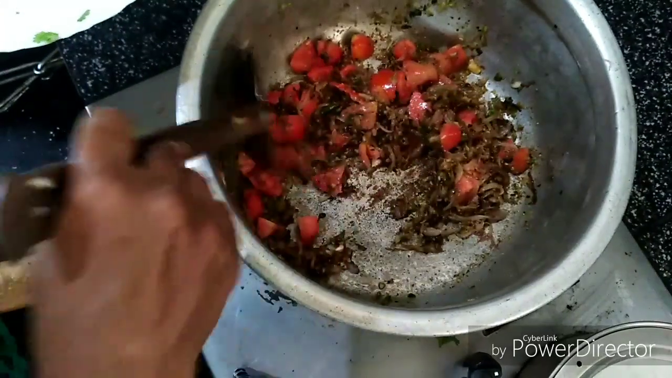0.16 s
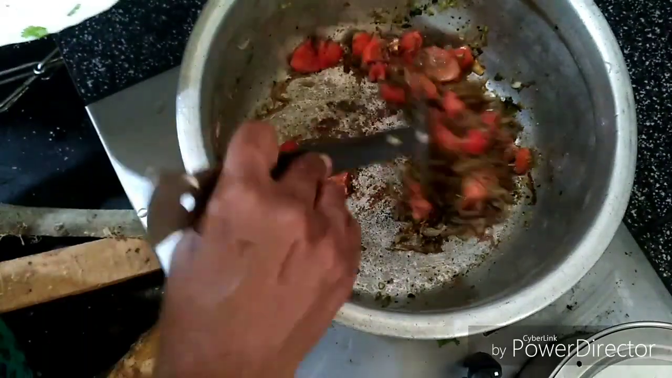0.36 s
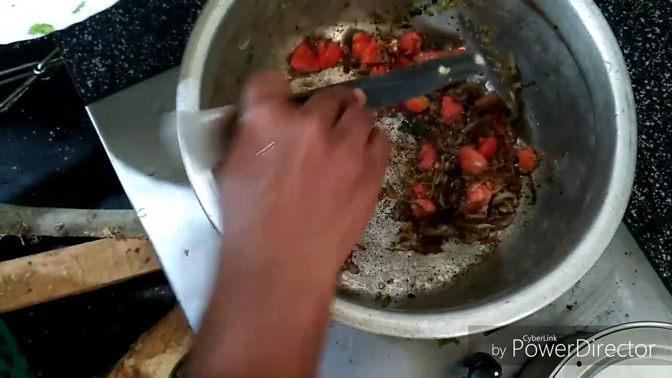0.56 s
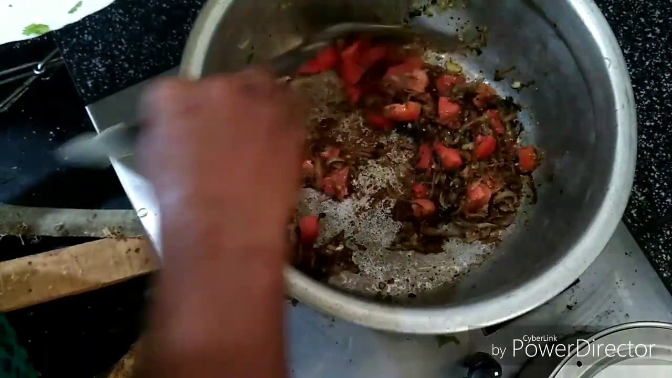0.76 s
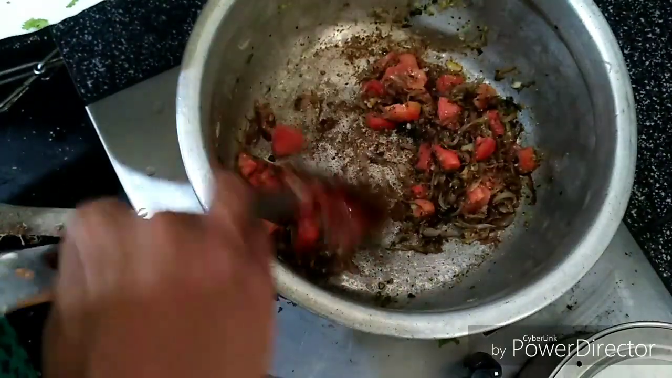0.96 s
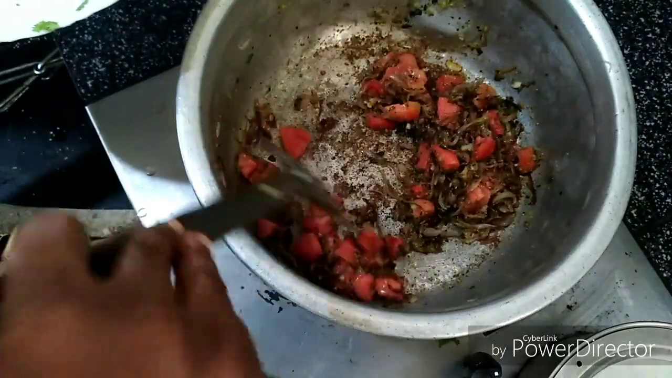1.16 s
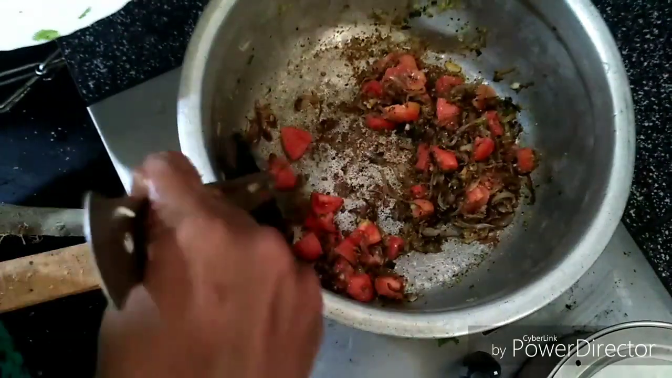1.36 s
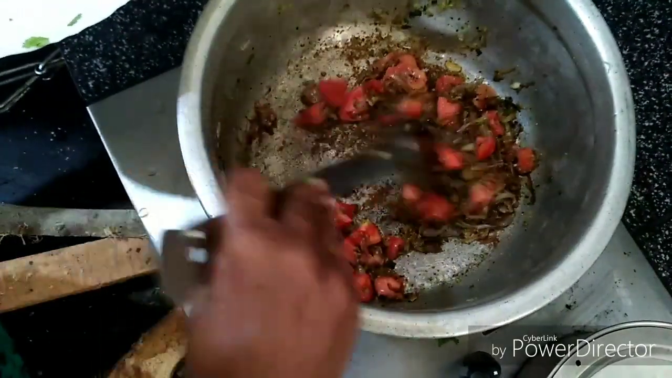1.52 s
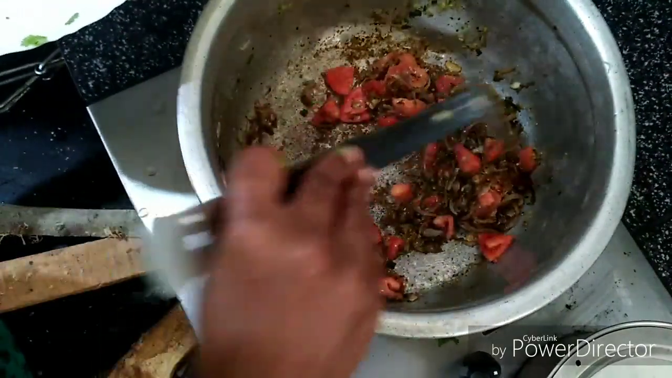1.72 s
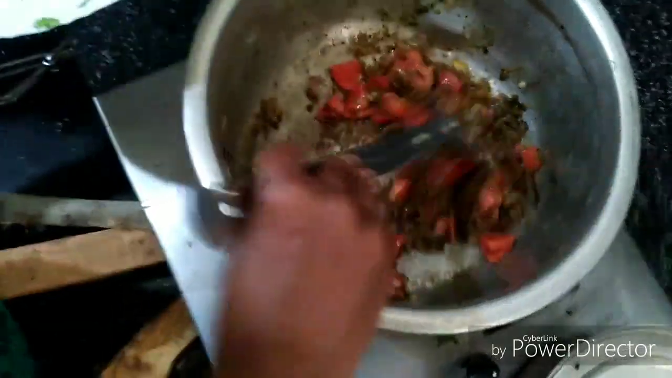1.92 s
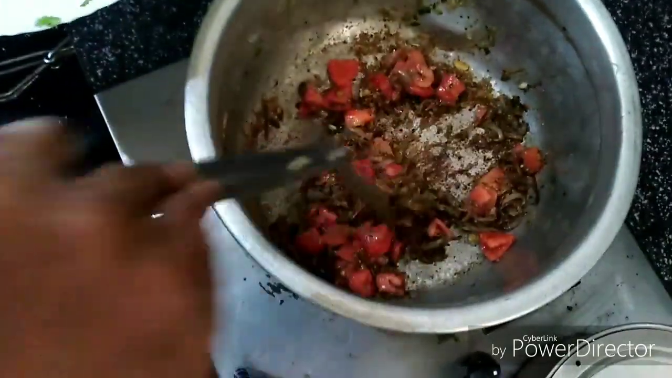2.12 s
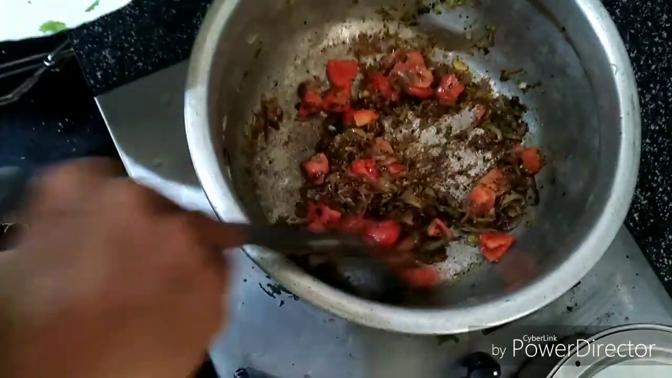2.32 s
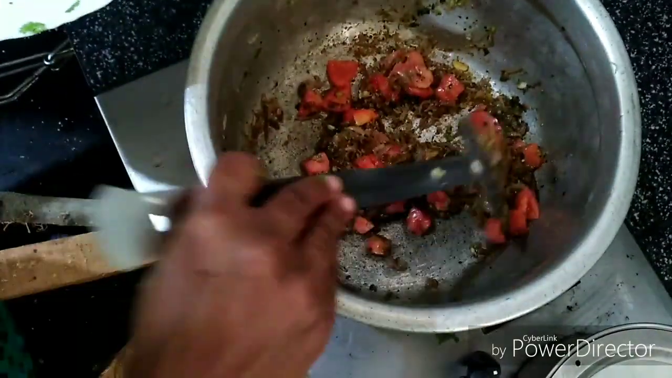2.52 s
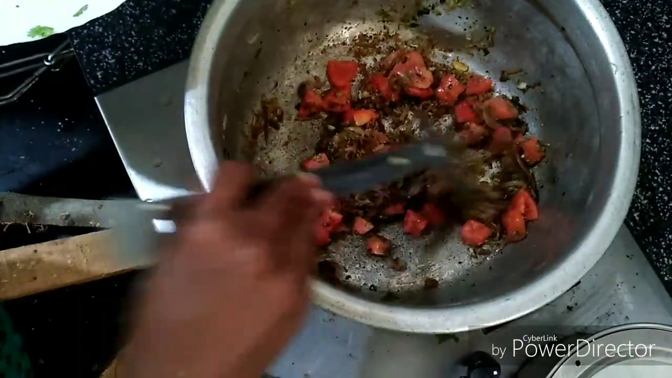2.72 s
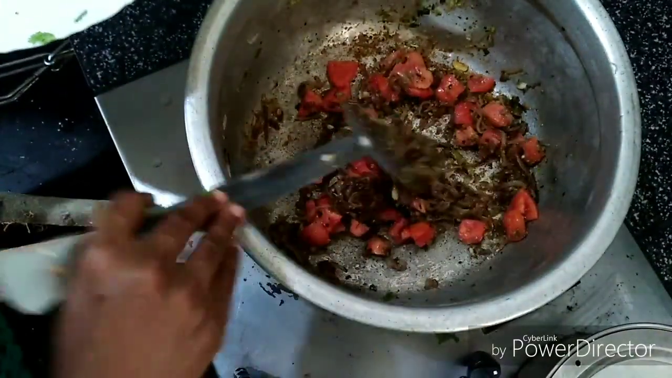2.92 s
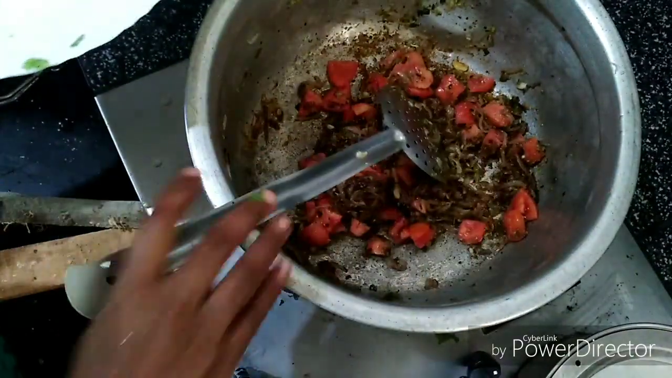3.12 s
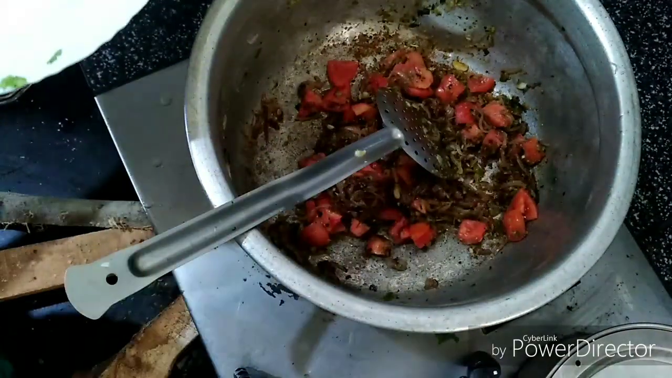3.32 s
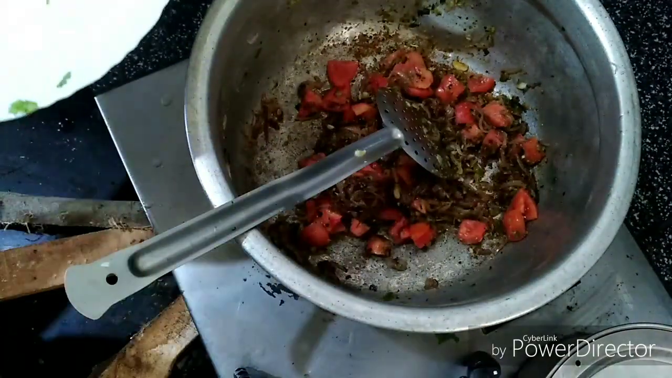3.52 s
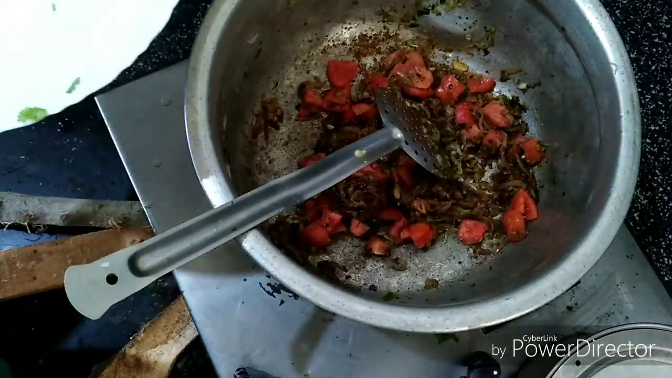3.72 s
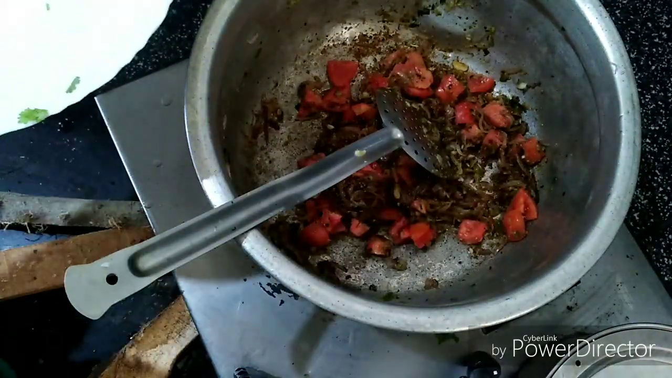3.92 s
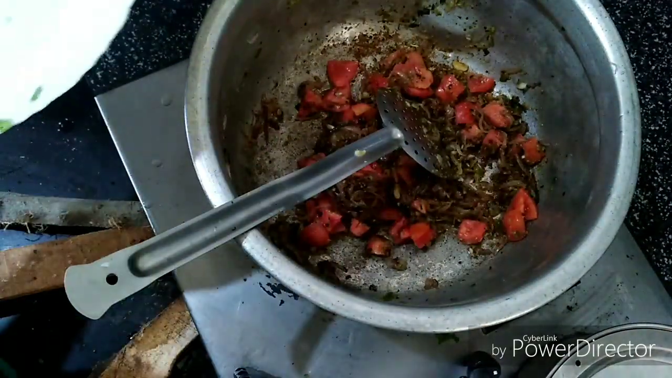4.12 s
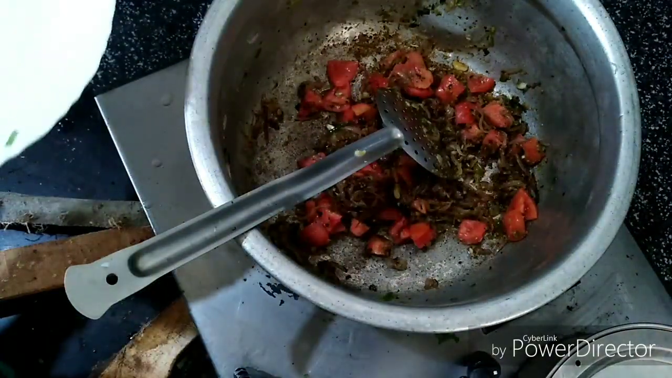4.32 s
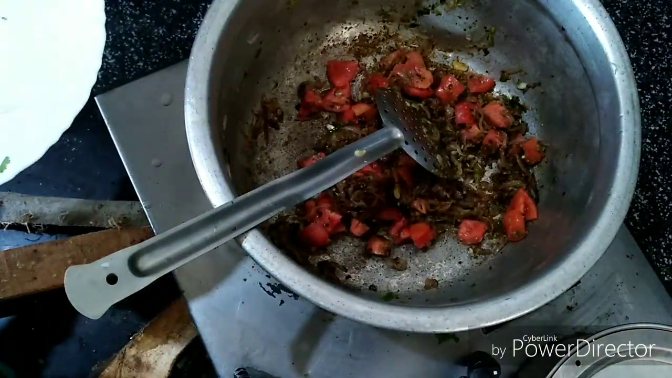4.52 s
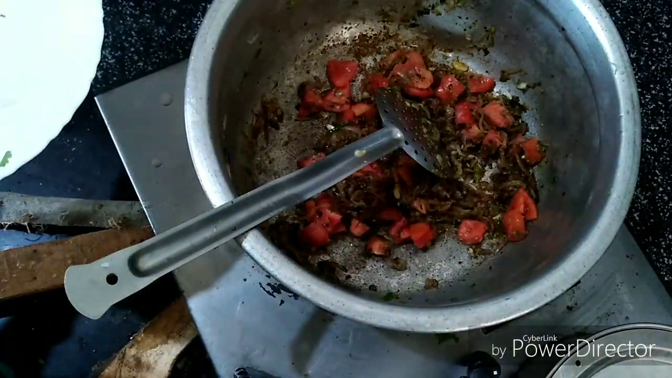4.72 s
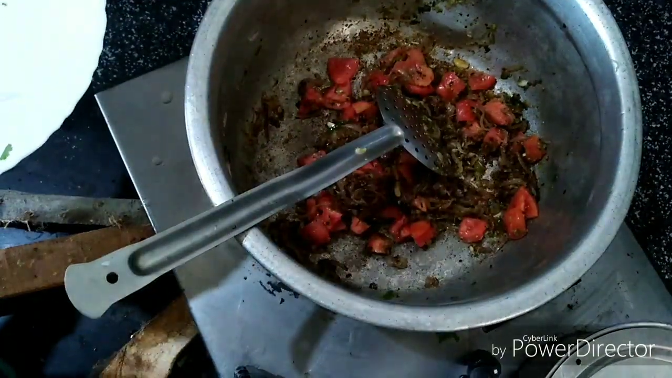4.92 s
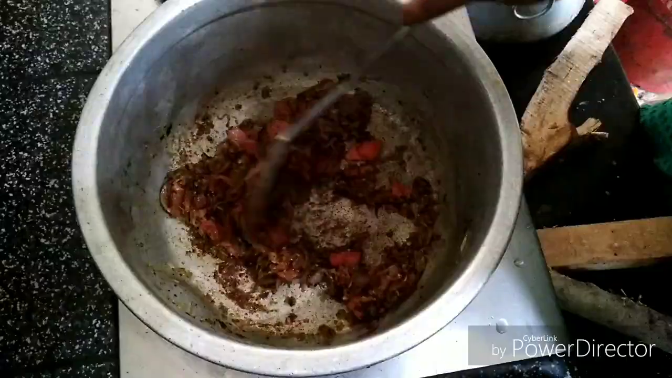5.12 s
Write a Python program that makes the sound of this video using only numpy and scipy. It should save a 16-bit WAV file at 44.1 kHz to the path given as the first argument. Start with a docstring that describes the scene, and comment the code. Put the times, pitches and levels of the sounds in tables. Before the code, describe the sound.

Close to the microphone in a small tiled kitchen, onions and tomatoes sizzle in a steel pot over a softly roaring gas flame. For three seconds a metal spoon clanks, knocks and scrapes the bottom, with short groaning judders. It is dropped on the rim in a double clank. Frying alone follows, with a fresh hiss, then a sudden cut and a very faint return.

```python
"""Frying in a steel pot

Onions and tomatoes sizzle in a steel pot on a gas burner, close to the microphone: filtered random impulses and noise.
A slotted metal spoon clanks against the wall (decaying modes and noise bursts), scrapes over the bottom
four times (random slips) and judders (short harmonic tones), then is dropped on the rim.
Near the end the sound breaks off and fades in again, much fainter and low-pass filtered."""
import sys
import numpy as np
from scipy import signal
from scipy.fft import rfft, irfft, next_fast_len
from scipy.io import wavfile
from scipy.ndimage import map_coordinates

SR = 44100
rng = np.random.default_rng(int(sys.argv[2]) if len(sys.argv) > 2 else 0)


def materialize(psi):
    """Save the field psi as 16-bit PCM at rate SR to the path in sys.argv[1].

    A 1-D psi becomes a single channel; in a 2-D psi each row is a channel.
    """
    bounded = np.clip(np.atleast_2d(psi).T, -1, 1)
    quanta = np.round(bounded * 32767).astype(np.int16)
    wavfile.write(sys.argv[1], SR, quanta)


N = 231850

# Modes of the pot wall: (frequency [Hz], level [dB], free t60 [s], left-right level [dB], left lead [rad])
POT_MODES = [(253, -9.5, .22, 2, 0.5), (482, -4, 0.6, -10, 1.5), (740.9, -2, 2.58, 1.5, 0.56),
             (870, -6, 0.2, 1, -1.2), (1156, -1, 0.22, 2, 2), (1152, -10, 0.82, 0.5, 1.7),
             (1250, -1.5, 0.93, 0.5, 1.5), (1563, 0.5, 0.38, 4.5, 2), (1676, -3.5, 0.12, -12.5, -1.5),
             (1959, 1.5, 0.63, 8.5, 3), (1982, -2.5, 0.24, -25, 2.5), (2040, -6.5, 0.19, -1.5, 11.5),
             (2570, -11.5, 0.4, -3.5, -2), (2650, -4.5, 0.79, 4, 4)]
# Spectrum of the spoon's edge rasping on the crust: (frequency [Hz], level [dB])
RASP_SPECTRUM = [(530, -22.5), (900, -1), (1050, -25.5), (1220, -2), (1390, -4.5), (8830, -6.5),
                 (13700, -23), (14500, -25), (15000, -74.5)]

EAR = np.array([[.5], [-.5]])  # shares a left-right difference between the channels
WALL_SCATTER_DB = 1  # standard deviation of each wall mode from blow to blow
WALL_LIFT_DB, WALL_LIFT_OCTAVES = 11.5, 0.7  # wall modes near the pitch of the contact are lifted


def amp(db):
    """Amplitude ratio: 20 dB are a factor of ten."""
    return 10 ** (np.asarray(db) / 20)


def unit(x):
    """Normalization to an effective value (rms) of 1."""
    return x / np.sqrt(np.mean(x ** 2) + 1e-20)


def along(points, hz):
    """Spectral envelope: (Hz, value) points joined on a logarithmic frequency axis."""
    point_hz, values = np.transpose(points)
    return np.interp(np.log(hz + 1), np.log(point_hz + 1), values)


def since(s):
    """Time axis: seconds after time s for every sample, negative before it."""
    return np.arange(N) / SR - s


def peak_db(s, rise_db, fall_db):
    """Exponential growth and decay: a level that climbs to 0 dB at time s and falls, both in dB per s."""
    t = since(s)
    return np.minimum(abs(rise_db) * t, -abs(fall_db) * t)


def wobble(rate, size=N):
    """Slow random modulation: a smooth curve through rate random knots a second."""
    knots = rng.standard_normal(int(size * rate / SR) + 4)
    fine = np.arange(len(knots) * 8) / 8
    curve = map_coordinates(knots, [fine])
    return np.interp(np.arange(size) * rate / SR, fine, curve)


def filtered(x, response):
    """Linear filtering: the spectrum of x times a response of frequency."""
    size = x.shape[-1]
    padded = next_fast_len(size + 8192)
    spectrum = rfft(x, padded) * response(np.fft.rfftfreq(padded, 1 / SR))
    return irfft(spectrum, padded)[..., :size]


def add(track, s, sound):
    """Superposition: mix a sound into the stereo track at time s."""
    part = track[:, round(s * SR):][:, :sound.shape[-1]]
    part += sound[..., :part.shape[-1]]


def noise(colour, size):
    """Partly coherent stereo noise of rms 1: channels alike in the bass, almost unrelated in the treble."""
    # Coherence of the channels: (frequency [Hz], left-right correlation [1])
    coherence = [(100, 0.89), (450, 0.95), (800, 0.7), (1300, 0.099), (10000, 0.035)]

    def response(hz):
        half_angle = np.arccos(np.clip(along(coherence, hz), -1, 1)) / 2
        return colour(hz) * np.array([np.cos(half_angle), np.sin(half_angle)])

    mid, side = filtered(rng.standard_normal((2, size)), response)
    return unit(np.array([mid + side, mid - side]))


def burst(spectrum, t60, attack):
    """High modal density: crowded resonances, struck at once and dying together, are decaying noise."""
    t = np.arange(SR // 4) / SR
    crowd = noise(lambda hz: amp(along(spectrum, hz)), size=len(t))
    return crowd * amp(-60 * t / t60) * (1 - np.exp(-t / attack))


def crackle(spectrum, rate, spread_db, t60, count):
    """Shot noise: random impulses from count spots, each with its own echo between the pot walls; rms 1."""
    sizes = amp(spread_db * np.minimum(rng.standard_normal(N), 2.8))
    sizes *= rng.choice([-1, 1], N)
    ticks = sizes * (rng.random(N) < rate / SR)  # rate is the mean number a second
    spot = rng.integers(count, size=N)
    out = np.zeros((2, N))
    for k in range(count):
        echo = burst([(1, 0)], t60, attack=1 / SR)[:, :SR // 25]
        own_ticks = (ticks * (spot == k))[None]
        out += signal.oaconvolve(own_ticks, echo, axes=1)[:, :N]
    return unit(filtered(out, lambda hz: amp(along(spectrum, hz))))


def sizzle():
    """Bubble noise: countless steam bubbles burst in the oil, more after each stir; drops spit, juice hisses."""
    # Spectrum of the bubbles and spitting drops: (frequency [Hz], level [dB])
    bubble_spectrum = [(200, -17.5), (650, -21.5), (1050, -16), (1360, -12), (1970, -8.5), (2500, -6),
                       (4300, -3), (6800, -3.5), (9000, -7.5), (13500, -12), (14500, -24.5)]
    # Spectrum of the hissing juice: (frequency [Hz], level [dB])
    jet_spectrum = [(2500, -44), (3700, -12), (4400, -1), (5200, -7.5), (7000, -12.5), (12000, -35.5)]
    # Direction of the frying: (frequency [Hz], left-right level [dB])
    lean = [(600, 6.5), (1300, 2.5), (2400, 0), (4300, 1), (7000, -4.5), (14000, -0.5)]
    # Spitting drops: (time [s], relative level [dB])
    pops = [(0.5094, -38), (0.6354, -29), (1.082, -20.5), (1.9553, -25.5), (2.1782, -23), (2.702, -21.5),
            (2.8103, -29), (3.845, -34), (4.8374, -27)]
    # Harder frying where the spoon has just spread the food: (time [s], rise before flare and settling [dB])
    stirs = [(0.3, 4), (0.62, 4.5), (0.9, 3.5), (1.48, 4.5), (1.9, 4), (2.7, 3.5), (2.95, 2)]
    rest_db, flare_s, settle_s = -34, 0.07, 0.39  # time constants of a stir's rise and decay
    jet_s, jet_db = 4.55, -37.5  # juice reaches the hot steel

    frying_db = rest_db + 0.47 * wobble(16)
    for s, rise_db in stirs:
        t = np.maximum(since(s), 0)
        frying_db = frying_db + rise_db * (1 - np.exp(-t / flare_s)) * np.exp(-t / settle_s)
    hiss_db = jet_db + peak_db(jet_s, rise_db=134, fall_db=9.5) + 1.1 * wobble(30)

    out = amp(frying_db) * crackle(bubble_spectrum, rate=7000, spread_db=2.5, t60=0.024, count=10)
    out += amp(hiss_db) * noise(lambda hz: amp(along(jet_spectrum, hz)), size=N)
    for s, db in pops:
        add(out, s, amp(db + 3.0) * burst(bubble_spectrum, t60=0.015, attack=.0002))
    return filtered(out, lambda hz: amp(EAR * along(lean, hz)))


def burner():
    """Combustion noise and cavity resonance: a soft flame roar, with the hollow of the pot singing in it."""
    # Resonances of the air in the pot: (frequency [Hz], width [Hz], level [dB])
    air_modes = [(412.4, 83, 3.5), (835.6, 81, 5.5)]
    # Spectrum of the flame: (frequency [Hz], level [dB])
    flame_spectrum = [(25, -21.5), (50, -6.5), (85, 5.5), (125, 1), (160, -7), (210, -18), (290, -7),
                      (350, -19.5), (1000, -33.5), (3000, -54)]

    def colour(f):
        hollow = 0
        for hz, width, db in air_modes:
            loss = (f * width) ** 2
            hollow = hollow + amp(db) * loss / ((hz * hz - f * f) ** 2 + loss)
        return np.hypot(hollow, amp(along(flame_spectrum, f)))

    level_db = -47 + 1.0 * wobble(1.6)
    return amp(level_db) * noise(colour, size=N) * amp([[1], [-1]])  # 2 dB stronger on the left


def favour(pitch_hz, db, octaves):
    """Selective excitation: lift in dB as a function of frequency, greatest at the pitch of the contact."""
    return lambda hz: db * np.exp(-(np.log2((hz + 1) / pitch_hz) / octaves) ** 2)


def contact_colour(x, lift):
    """Dependence on the striking point: the place of contact lifts and randomly weights the clash."""
    uneven_db, cluster_hz = 4, 221.9  # random weights, in clusters of this width

    def response(hz):
        knots = rng.standard_normal(int(hz[-1] / cluster_hz) + 4)
        return amp(lift(hz) + uneven_db * map_coordinates(knots, [hz / cluster_hz]))

    y = filtered(x, response)
    return y * x.std() / y.std()


def ring(modes, s, lift, damping, scatter_db):
    """Modal synthesis: damped sines struck at time s; spoon contact adds damping in dB per s (sign ignored)."""
    # The spoon leans on the wall and stills its ring: (time [s], lowest stilled frequency [Hz])
    touches = [(0.26, 1400), (0.705, 100), (1.425, 1000), (1.85, 100), (3.03, 100), (3.309, 1400)]
    out = np.zeros((2, 2 * SR))
    for hz, db, t60, pan_db, lead in modes:
        life = min(60 / (60 / t60 + abs(damping)), 2)  # decay rates add; t60 is held to 2 s
        t = np.arange(int(life * SR)) / SR
        size = amp(db + lift(hz) + scatter_db * rng.standard_normal() + EAR * pan_db)
        decay = np.exp(-np.log(1000) * t / life) * (1 - np.exp(-t / 0.0011))
        later = [touch - s for touch, lowest_hz in touches if touch > s and hz > lowest_hz]
        free = min(later, default=life)  # seconds of ringing before the next touch
        stilled = np.exp(-np.maximum(t - free, 0) / 0.019)
        wave = np.sin(2 * np.pi * (hz * t + rng.random()) + EAR * lead)
        out[:, :len(t)] += size * decay * stilled * wave
    return out


def push(width):
    """Transient displacement: one swing of the pot's bottom as it is shoved, width in s."""
    u = np.arange(SR // 100) / SR / width - 3
    return (2 * u * u - 1) * np.exp(-u * u)


def thud(t60):
    """Impulse on a supported body: the shoved pot gives one swing of the bottom and a dull rattle."""
    # Spectrum of the pot on its stand: (frequency [Hz], level [dB])
    knock_spectrum = [(50, -28.5), (100, -7.5), (170, -12.5), (260, 1), (430, 1), (620, -6), (860, -4),
                      (1100, -13.5), (2000, -26), (4000, -70)]
    out = amp(1.5) * burst(knock_spectrum, t60, attack=0.00049)
    add(out, 0, amp(6.5) * push(width=0.00065))
    return out


def clanks():
    """Impact excitation: a bright clash, a knock of the pot on its stand, a ring of wall and spoon."""
    # Blows of the spoon's edge, and weak re-rings of the pot at 0.3233 and 1.56 s, fed by the scraping:
    # (time [s], relative clash level [dB], clash t60 [s], clash pitch [Hz], knock level [dB],
    # wall ring level [dB], wall pitch [Hz], damping by contact [dB/s])
    strikes = [(0.2052, -13, 0.082, 3780, -15, -25, 520, 3.5),
               (0.3233, -23, 0.035, 4000, -38, -38.5, 580, 13),
               (0.7931, -21, 0.064, 5200, -11, -23, 1130, 599),
               (1.31, -25.5, 0.05, 4410, -34, -50, 1450, 199.5),
               (1.3132, -12, 0.087, 4560, -18.5, -26, 1450, 18),
               (1.56, -25.5, 0.035, 4000, -28, -42.5, 710, -1),
               (2.327, -8, 0.095, 3300, -17.5, -26, 940, 19),
               (2.339, -13.5, 0.22, 4800, -28, -36.5, 1250, 47),
               (3.08, -13, 0.083, 3100, -16.5, -30.5, 1900, 150),
               (3.1983, -15.5, 0.18, 4550, -22.5, -26, 2740, 79)]
    # Spectrum of the spoon's bowl: (frequency [Hz], level [dB])
    clash_spectrum = [(590, -30.5), (1000, -42), (1560, -13.5), (1800, -17.5), (1970, -7.5), (2240, -24.5),
                      (2770, -4), (4220, -3.5), (9980, -17), (13700, -30.5), (15000, -49)]
    # Modes of the slotted spoon: (frequency [Hz], level [dB], free t60 [s], left-right level [dB], left lead [rad])
    spoon_modes = [(2913, -1, 0.21, -4, 1.1), (2970, -0.5, 0.077, -4, 0.42), (3180, -1, 0.15, 0, 1.2),
                   (3300, 2, 0.13, 2, 0.71), (3476, -10, 0.29, 8, 1.5), (3300, -17, 0.15, -5.5, 1.5),
                   (4200, 5.5, 0.05, -2.5, 0.63), (4410, -1, 0.11, 4.5, 0.7), (5005, 0.5, 0.13, 9, 0.56),
                   (5319, -7.5, 0.42, 3.5, 2.9), (5700, -12, 0.49, -2.5, 0.85),
                   (6210, -3.5, 0.21, 0.5, 0.5), (8250, 1.5, 0.1, 1, 1.8), (10500, -20, .14, -2, 1.4)]
    out = np.zeros((2, N))
    for s, clash_db, t60, clash_hz, knock_db, wall_db, wall_hz, damping in strikes:
        spoon_lift = favour(clash_hz, db=3, octaves=0.25)
        wall_lift = favour(wall_hz, WALL_LIFT_DB, WALL_LIFT_OCTAVES)
        clash = amp(3.5) * burst(clash_spectrum, t60, attack=0.00026)
        clash += amp(2) * burst(RASP_SPECTRUM, t60=0.06, attack=.0003)  # the edge bites into the crust
        spoon_ring = ring(spoon_modes, s, spoon_lift, damping, scatter_db=1)
        wall_ring = ring(POT_MODES, s, wall_lift, damping, WALL_SCATTER_DB)
        add(out, s, amp(clash_db) * contact_colour(clash, spoon_lift))
        add(out, s, amp(clash_db - 11) * spoon_ring)
        add(out, s, amp(knock_db) * thud(1.2 * t60))  # the knock outlasts the clash
        add(out, s, amp(wall_db) * wall_ring)
    return out


def judders():
    """Stick-slip oscillation: slips under pressure lock into short sinking groans; one tone is a hum of the pot."""
    # Short low tones: groans of the spoon's edge, and a low hum of the pot after the blow at 1.31 s:
    # (time [s], length [s], starting pitch [Hz], level [dB])
    tones = [(0.21, 0.042, 442, -24.5), (0.285, 0.06, 496.3, -27), (0.863, 0.015, 623, -16),
             (0.877, 0.024, 446, -16.5), (0.912, 0.058, 303, -24.5), (1.32, 0.062, 233.6, -34.5),
             (1.468, 0.051, 550, -33), (2.344, 0.067, 490.4, -18), (2.426, 0.04, 452, -21)]
    sag_octaves_per_s = 1.42  # the groans sink as the spoon slows
    out = np.zeros((2, N))
    for s, length, hz, db in tones:
        u = np.linspace(0, 1, round(length * SR))
        sag = 2 ** (-sag_octaves_per_s * length * u)
        pitch = hz * sag * (1 + 0.03 * wobble(200, size=len(u)))
        phase = 2 * np.pi * np.cumsum(pitch) / SR
        swell = np.sqrt(np.abs(np.sin(np.pi * u))) * amp(db + 5.0 * wobble(120, size=len(u)))
        harmonics = np.sin(phase) + amp(-22) * np.sin(2 * phase) + amp(-28.5) * np.sin(3 * phase)
        add(out, s, swell * harmonics * np.sqrt(2))
    return out


def scrapes():
    """Friction noise: coarse slips on the crust shake the pot under pressure, fine ones rasp with speed."""
    # Strokes over the bottom: (touch-down [s], lift [s], relative rub level [dB],
    # rasp level at the lift [dB], release [dB/s])
    strokes = [(0.245, 0.328, -24.5, -23.5, 132), (0.864, 0.961, -25.5, -18, 398.5),
               (1.446, 1.556, -29, -20.5, 400), (2.346, 2.47, -25, -21, 330)]
    # Spectrum of the pot shaken by coarse slips: (frequency [Hz], level [dB])
    rub_spectrum = [(50, -39.5), (100, -18.5), (180, -11), (290, -4), (350, -19.5), (440, 1), (650, -19),
                    (880, -3.5), (1050, -21.5), (1230, -14.5), (1500, -56), (3000, -45)]
    touch_down_s, rasp_rise_db_per_s = 0.0043, 95  # the rasp grows as the spoon gathers speed
    shove_db, shove_fall_db_per_s = -10.5, 45.5  # food still pushed along after the lift, under the rub

    rub = crackle(rub_spectrum, rate=300, spread_db=4.5, t60=0.036, count=4)
    rasp = crackle(RASP_SPECTRUM, rate=1800, spread_db=5.0, t60=0.045, count=4)
    grip_db = 1.8 * wobble(70)  # the edge bites and lets go
    out = np.zeros((2, N))
    for start, lift, rub_db, rasp_db, release_db in strokes:
        touching = np.clip(since(start) / touch_down_s, 0, 1)
        lifted = np.maximum(since(lift), 0)
        pressure_db = np.maximum(-release_db * lifted, shove_db - shove_fall_db_per_s * lifted)
        speed_db = peak_db(lift, rasp_rise_db_per_s, release_db)
        coarse = amp(rub_db + pressure_db - 2.0) * rub
        fine = amp(rasp_db + speed_db) * rasp
        out += touching * (coarse + fine)
    return amp(grip_db) * out


def bumps():
    """Cushioned impact: with food between spoon and wall a blow knocks the pot and barely rings it."""
    # Blows cushioned by food: (time [s], knock level [dB])
    blows = [(0.2585, -14.5), (0.712, -23.5), (0.8164, -16.5), (0.863, -19.5)]
    out = np.zeros((2, N))
    lift = favour(897, WALL_LIFT_DB, WALL_LIFT_OCTAVES)  # low pitch of contact, Hz
    for s, db in blows:
        wall_ring = ring(POT_MODES, s, lift, damping=249.5, scatter_db=WALL_SCATTER_DB)
        add(out, s, amp(db) * thud(t60=0.048))
        add(out, s, amp(db - 27) * wall_ring)
    return out


def kitchen(x):
    """Reverberation: convolution with decaying noise gives the short answer of the tiled walls."""
    tail = burst([(100, 2), (500, -2.5), (5000, -3), (14000, -9)], t60=0.34, attack=0.0056)
    return signal.fftconvolve(x, tail / np.linalg.norm(tail[0]), axes=1)[:, :N]


def scene():
    """Superposition of spoon, frying and flame; the spoon alone is answered by the kitchen."""
    spoon = clanks() + bumps() + scrapes() + judders()
    spoon_lean = [(2000, 1.0), (5000, -3.5), (12000, -2.0)]  # (Hz, left-right dB)
    spoon = filtered(spoon, lambda hz: amp(EAR * along(spoon_lean, hz)))
    return spoon + amp(-9.5) * kitchen(spoon) + sizzle() + burner()


def record(dry):
    """Band limiting and saturation: thin bass, rounded peaks; the sound breaks off, returns low-pass filtered."""
    # Low-pass filter on the sound after the break: (frequency [Hz], level [dB])
    low_pass = [(150, 9), (1500, 0), (4000, -3), (10000, -2), (11500, -15.5), (12500, -31)]
    low_hz, top_hz = 58, 14400
    level_db, break_s, cut_db_per_s = -2.5, 4.98, 2801
    return_s, return_db, return_db_per_s = 5.087, -26, 67.5

    x = signal.sosfilt(signal.butter(3, low_hz, "highpass", fs=SR, output="sos"), dry)
    before = amp(level_db - cut_db_per_s * np.maximum(since(break_s), 0))
    onset = np.clip(since(return_s) / 0.0089, 0, 1)
    after = amp(return_db + return_db_per_s * since(return_s)) * onset
    x = before * x + after * filtered(x, lambda hz: amp(along(low_pass, hz)))
    x = x / (1 + x ** 6) ** (1 / 6)  # soft limit at 1
    return filtered(x, lambda hz: 1 / np.sqrt(1 + (hz / top_hz) ** 120))  # steep upper edge


dry = scene()
out = record(dry)
materialize(out)
```